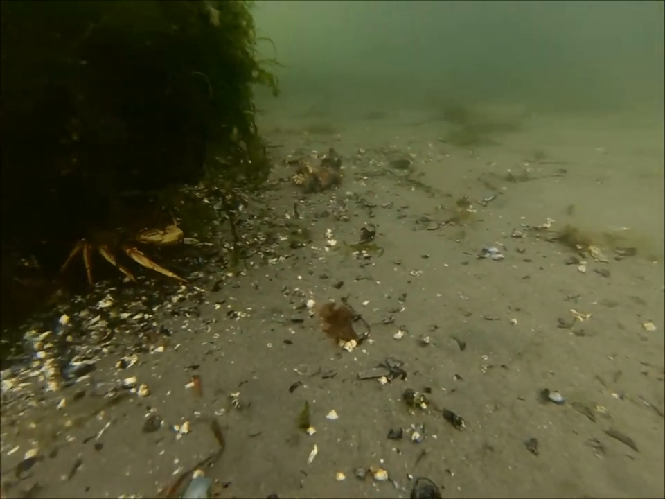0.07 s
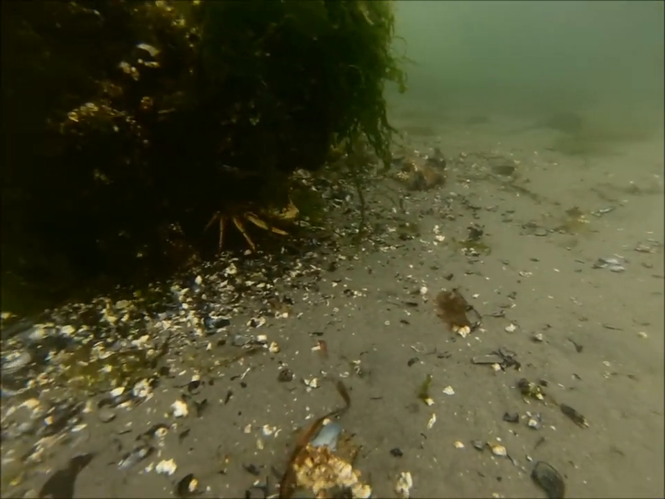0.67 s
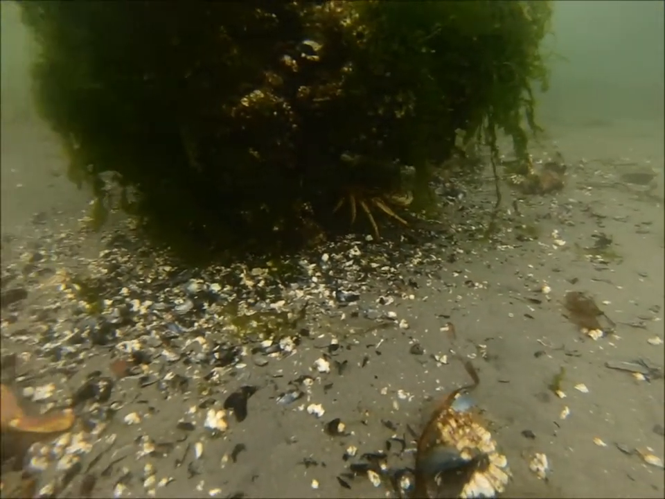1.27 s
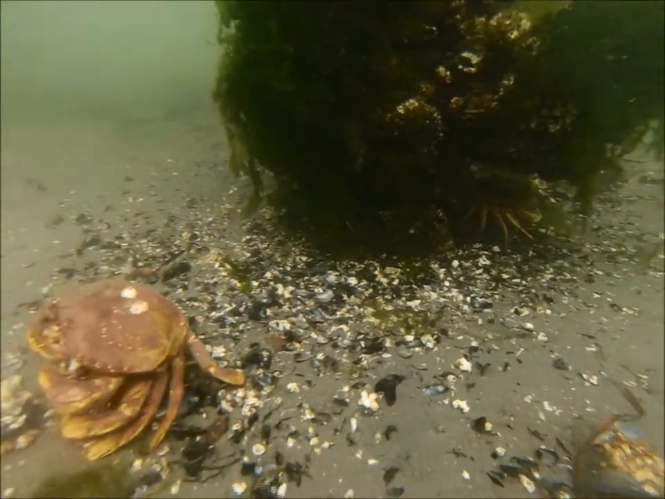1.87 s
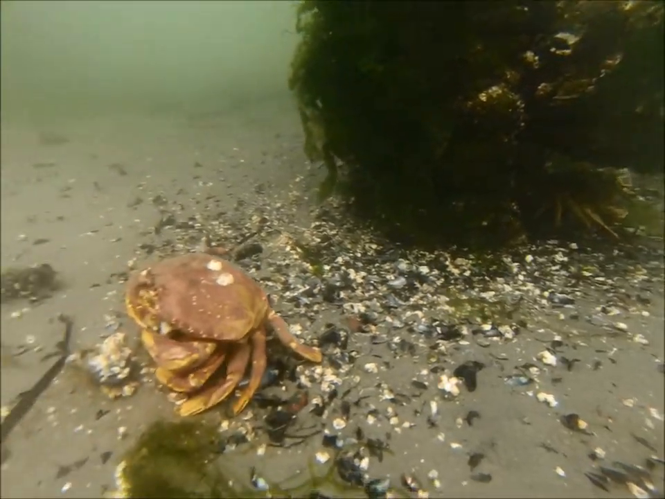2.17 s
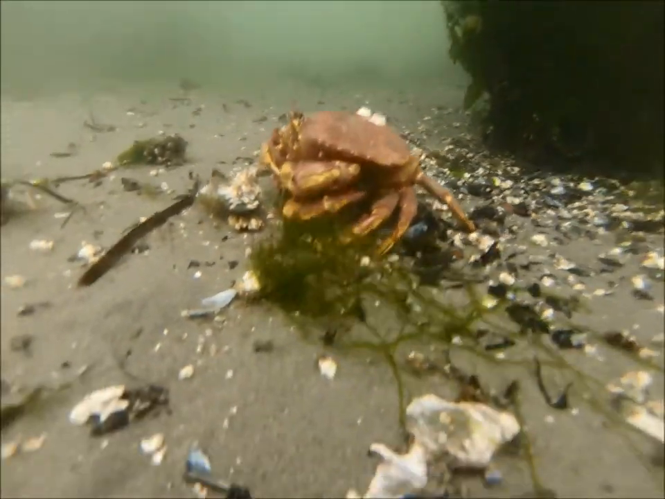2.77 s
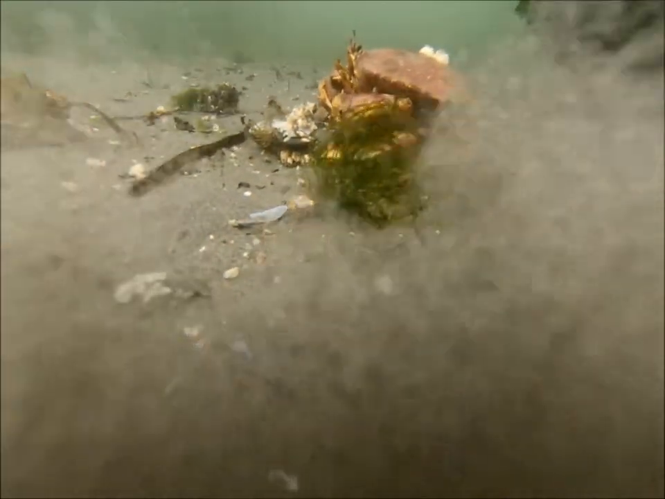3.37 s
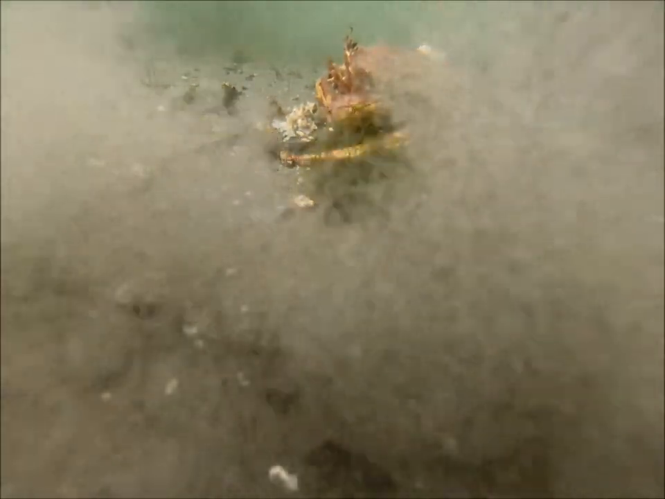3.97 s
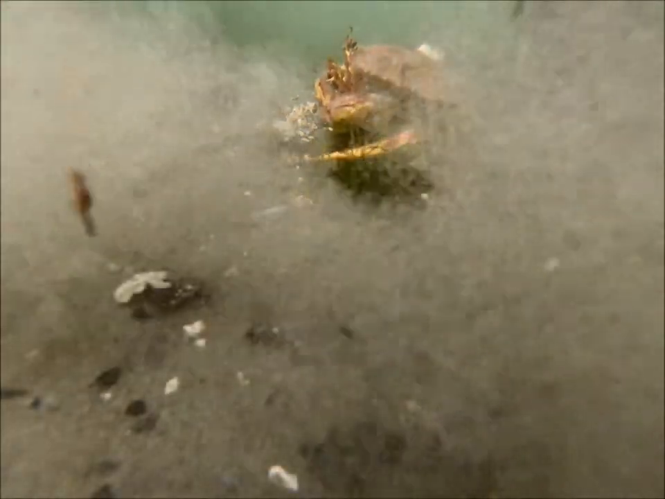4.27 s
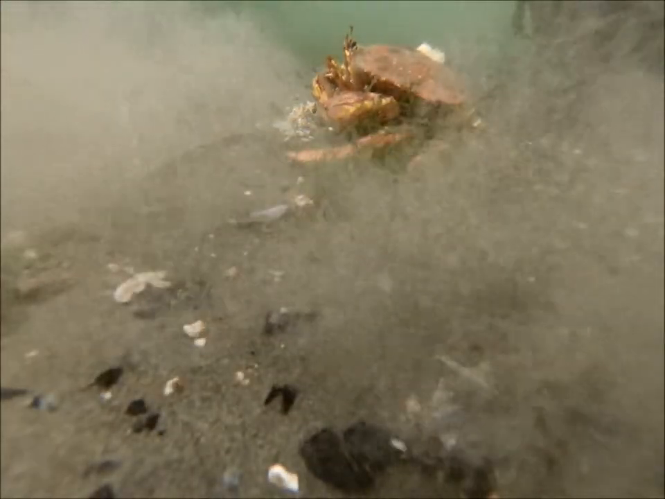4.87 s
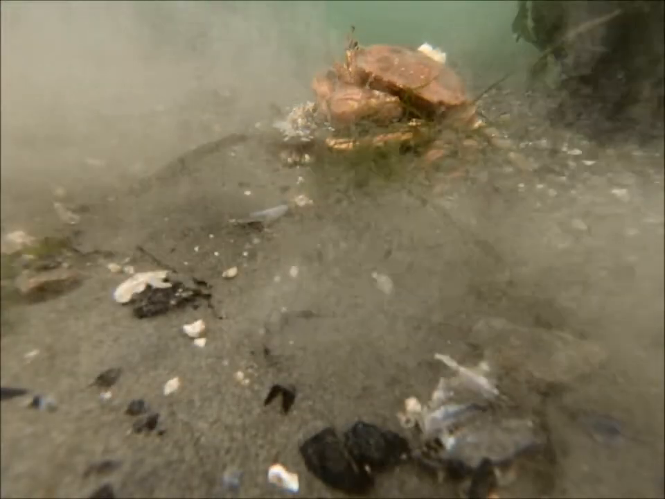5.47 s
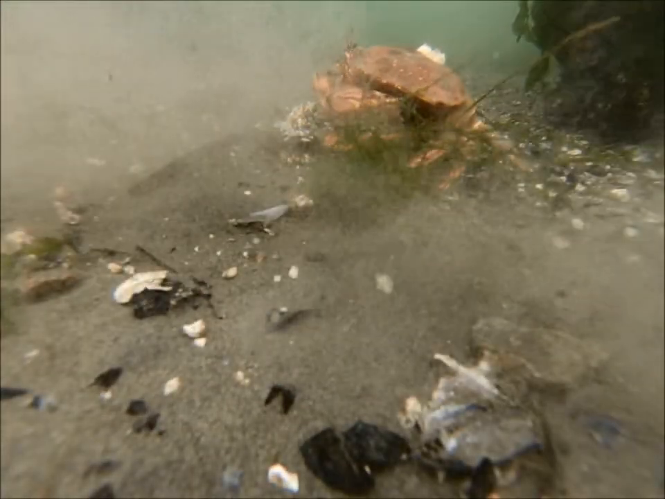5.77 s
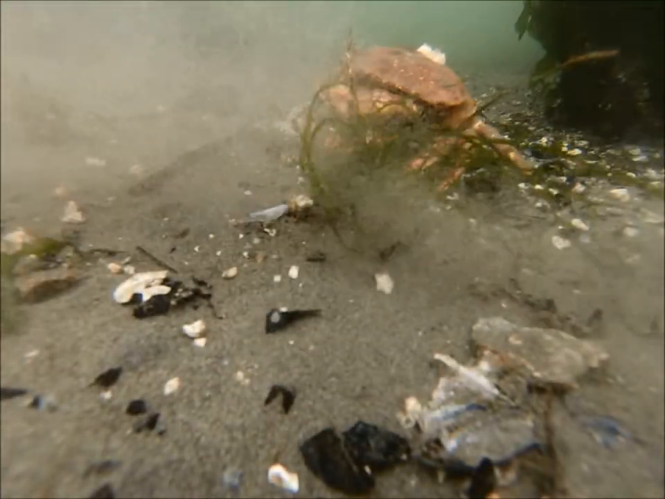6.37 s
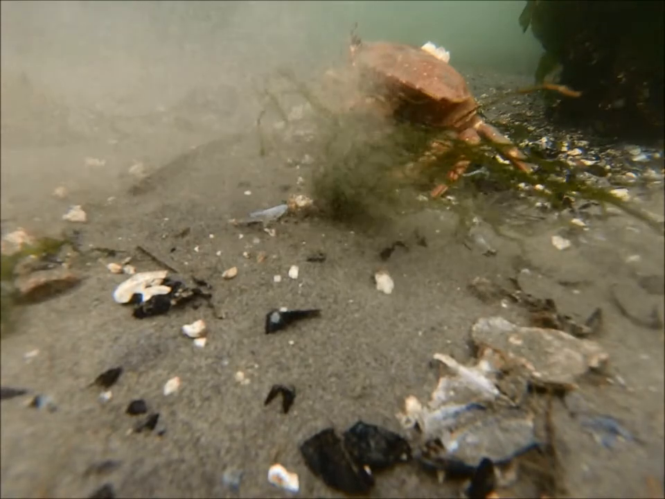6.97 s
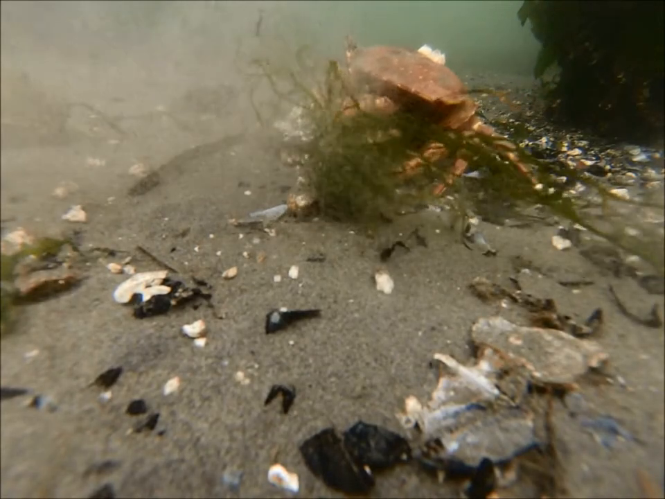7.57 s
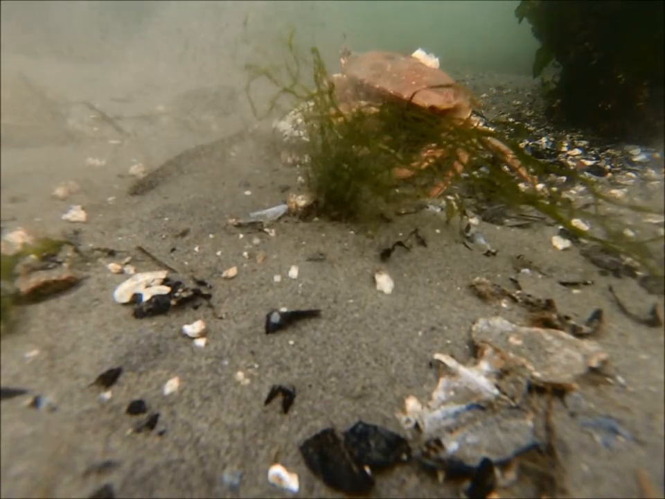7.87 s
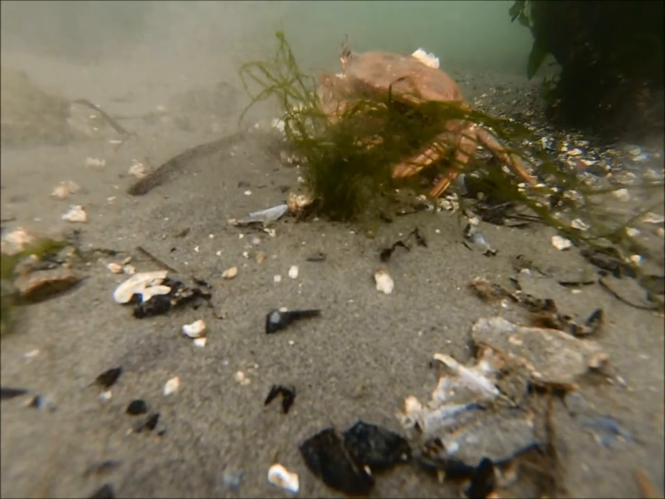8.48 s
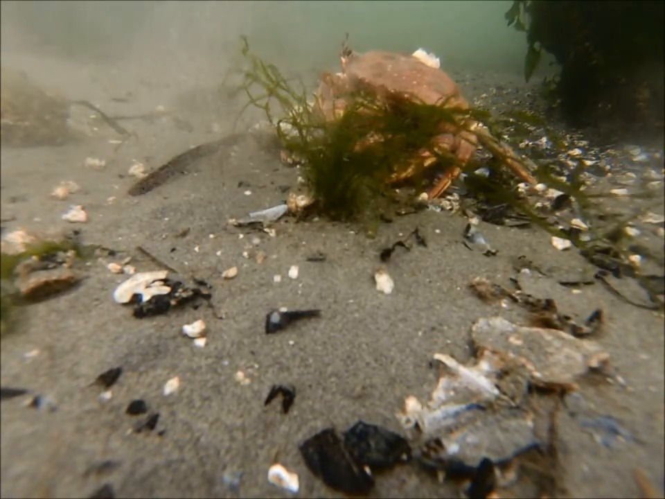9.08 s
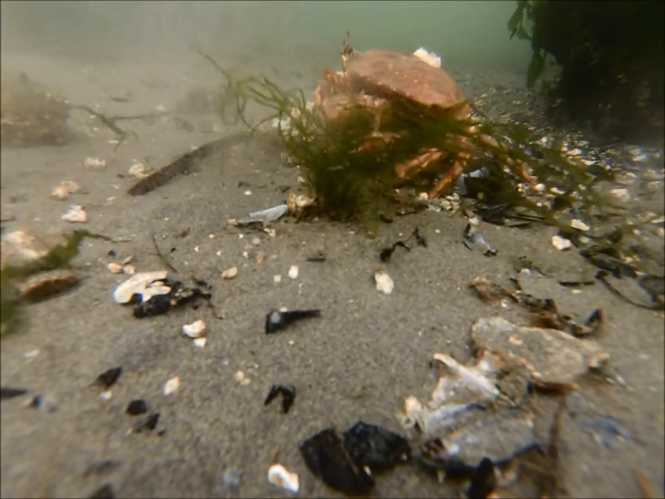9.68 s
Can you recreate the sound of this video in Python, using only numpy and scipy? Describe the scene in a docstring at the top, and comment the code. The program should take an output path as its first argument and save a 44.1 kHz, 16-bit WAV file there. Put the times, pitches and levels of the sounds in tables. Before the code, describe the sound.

A camera housing bumps down among sand and shells underwater, heard close through its own microphone. One sharp knock comes first, then several hollow, quickly damped knocks with a low thud and a short gritty scrape. Before and after, water rumbles softly against the case under a steady hiss. Once it has settled, loose grains tap faintly, the lens motor whirs almost inaudibly, and a few tiny clicks come from the water.

```python
"""A waterproof camera housing drifts over a sandy seabed and bumps down among shells.
Each contact rings its water-damped modes; it scrapes on sand and wobbles to rest, tapped by loose grains.
The hand rubs and shoves it, and the flow rumbles against it. Inside, the lens drive whirs in short runs
over microphone hiss. A few tiny snaps come from the water."""
import sys
import numpy as np
from scipy import signal
from scipy.fft import rfft, irfft
from scipy.io import wavfile

SR = 44100
rng = np.random.default_rng(int(sys.argv[2]) if len(sys.argv) > 2 else 0)


def to_wav(s):
    """Save 16-bit WAV."""
    ch = np.atleast_2d(s).T  # columns
    pcm = np.round(np.clip(ch, -1, 1) * 32767)  # PCM
    wavfile.write(sys.argv[1], SR, pcm.astype(np.int16))


N = 429093
TIME_S = np.arange(N) / SR
BINS_HZ = np.fft.rfftfreq(N, 1 / SR)

# Flow past the housing. Each row: time in seconds, sway level in dB, rumble level in dB.
FLOW_LEVELS = [(0, -56, -58.5), (1.0, -60, -62.5), (1.9, -56.5, -64), (2.8, -53.5, -60), (3.4, -59.5, -61),
               (4.0, -50.5, -62.5), (4.4, -57.5, -62.5), (5.1, -55, -57.5), (5.701, -62.5, -64.5),
               (6.6, -56, -59.5), (7.9, -61, -64), (8.9, -64.5, -63), (9.35, -54.5, -64.5),
               (9.73, -64.5, -64.5)]
# Slow pressure sway. Each row: frequency in Hz, relative density in dB.
SWAY_SPECTRUM = [(10, -23.5), (22, 7.5), (29, 8), (45, -2.5), (60, -8.5), (100, -53)]
# Flow rumble. Each row: frequency in Hz, relative density in dB.
RUMBLE_SPECTRUM = [(35, -16.5), (60, -9), (88, -1), (125, -9.5), (200, -11), (300, -22.5), (450, -45.5),
                   (570, -24.5), (800, -33), (1500, -46)]
# Hand friction. Each row: time in seconds, level in dB.
RUB_LEVELS = [(0, -66), (.25, -62), (.35, -86.5), (2.6, -83), (2.75, -70), (2.92, -62), (3.0, -100)]
# Housing modes. Each row: frequency in Hz, relative level in dB, base T60 in seconds.
HOUSING_MODES = [(188.2, -15.5, 0.059), (265, -14, 0.028), (377, -8, 0.075), (450, -12, .06),
                 (553, -3, 0.061), (732, -7.5, 0.055), (846.5, -8.5, 0.044), (1067, -2, 0.039),
                 (1320, -6.5, 0.061), (1514, -12.5, 0.0417), (1796, -4, 0.03), (2135, -11, 0.037),
                 (2550, -12.5, 0.029), (3136, -12.5, 0.031), (4460, -0.5, 0.011), (6930, -11.5, .012)]
# Microphone hiss. Each row: frequency in Hz, relative density in dB.
HISS_SPECTRUM = [(100, 15), (600, 3.5), (1000, -0.5), (2000, -2), (4000, -6), (7000, -8.5), (10000, -10.5),
                 (11000, -9), (12600, -12.5), (15000, -14.5)]
# Shoves on camera and grip. Each row: start in seconds, level in dB, swing rate in Hz, rise in seconds.
SHOVES = [(0.079, -36.5, 31.3, 0.058), (0.100, -44.5, 88, 0.044), (0.430, -39.5, 29.3, 0.099),
          (2.149, -41.5, 146.5, 0.031), (2.922, -31.5, 88, .0072), (2.996, -13.5, 30.6, .04),
          (3.007, -25, 87, .0027), (3.060, -34, 160, 0.0064), (3.616, -37.5, 146, .03),
          (5.879, -34, 85.4, .08), (6.440, -40.5, 71.4, 0.0035), (7.031, -38, 59.1, 0.026),
          (7.659, -43.5, 85, .03)]
# Lens drive resonances. Each row: centre in Hz, width in Hz, relative level in dB.
LENS_RESONANCES = [(2370, 105, -0.5), (2720, 180, -1.5), (3773, 420, -9), (10840, 1220, -6.5),
                   (13880, 890, -11.5), (14900, 450, -14.5)]
# Seabed contacts. Each row: start in seconds, peak in dB, brightness in Hz,
# two regions in Hz favoured by the struck spot, factor on ring time.
BED_CONTACTS = [(2.5662, -11, 2050, 1060, 1800, 0.67), (2.586, -38, 3000, 1810, 2600, .5),
                (2.5953, -21, 3900, 2210, 2600, 0.33), (2.602, -37, 5500, 2130, 3000, 1.3),
                (2.922, -17.5, 2270, 545, 554, 1.05), (2.93, -27.5, 2900, 1930, 1340, 0.3),
                (2.965, -37, 1500, 560, 1320, 1.0), (2.9743, -21.5, 903, 830, 800, 1.0),
                (3.0013, -10, 3157, 1317, 1957, 0.3), (3.003, -13, 1050, 757, 735, .75),
                (3.026, -27, 2500, 2130, 2154, .86), (3.038, -34, 3600, 1300, 1900, .45),
                (3.052, -37, 3900, 2130, 2500, .3), (3.0637, -26.5, 654, 550, 470, 0.6),
                (3.141, -16.5, 580, 374, 378, 1.04), (3.3224, -49, 1800, 1000, 600, .4),
                (4.456, -53, 700, 371, 553, 0.66), (4.8741, -55, 800, 470, 750, .6),
                (5.0897, -51, 1000, 750, 550, 0.36), (6.309, -54, 1100, 602, 750, 0.41)]
# Sand grinding under the housing. Each row: time in seconds, level in dB.
SCRAPE_LEVELS = [(2.93, -48), (2.99, -49.5), (3.02, -44), (3.08, -44.5), (3.15, -46), (3.2, -51),
                 (3.26, -64.5), (3.3, -87)]
# Grinding sand. Each row: frequency in Hz, relative density in dB.
SAND_SPECTRUM = [(150, 3), (380, -2.5), (560, 3.5), (830, 1), (1400, -15), (1750, -13), (2130, -5.5),
                 (2800, -19), (3500, -25.5), (8000, -49.5)]
# Snaps in the water. Each row: start in seconds, crack level in dB, ring level in dB, ring pitch in Hz.
WATER_SNAPS = [(3.067, -61, -50, 5860), (6.31, -48, -55, 8000), (6.9158, -56, -57, 4500),
               (8.4249, -63, -56, 7500), (9.1567, -65, -57, 7500), (9.5219, -46, -43.5, 7140)]


def amp(db):
    """dB to gain."""
    return 10 ** (np.asarray(db) / 20)


def unit(x):
    """Scale to rms 1."""
    return x / np.sqrt(np.mean(x ** 2) + 1e-20)


def add(mix, start_s, sound):
    """Mix in a sound at start_s."""
    part = mix[round(start_s * SR):][:len(sound)]
    part += sound[:len(part)]


def colour(x, points):
    """Filter by (Hz, dB) points; output at rms 1."""
    hz, db = np.transpose(points)
    gain = amp(np.interp(np.log(BINS_HZ + 1), np.log(hz), db))
    return unit(irfft(rfft(x) * gain, N))


def lowpass(x, hz, order):
    """Butterworth low-pass."""
    return signal.sosfilt(signal.butter(order, min(hz, .45 * SR), fs=SR, output="sos"), x)


def water(wake_rise_s=.04, wake_fade_s=.26, wake_sway_db=-51, wake_rumble_db=-58):
    """Uneven pressure on the housing: slow flow, plus a wake after each shove."""
    times_s, sway_db, rumble_db = np.transpose(FLOW_LEVELS)
    ages_s = (np.maximum(TIME_S - start_s, 0) for start_s, *_ in SHOVES)
    wakes = [(1 - np.exp(-age_s / wake_rise_s)) * np.exp(-age_s / wake_fade_s) for age_s in ages_s]
    wake = np.max(wakes, axis=0)
    sway_gain = np.hypot(amp(np.interp(TIME_S, times_s, sway_db)), amp(wake_sway_db) * wake)
    rumble_gain = np.hypot(amp(np.interp(TIME_S, times_s, rumble_db)), amp(wake_rumble_db) * wake)
    sway = sway_gain * colour(rng.standard_normal(N), SWAY_SPECTRUM)
    rumble = rumble_gain * colour(rng.standard_normal(N), RUMBLE_SPECTRUM)
    return sway + rumble


def hand_rub(cutoff_hz=480, damping=1.6):
    """A soft grip excites only the low housing modes."""
    body = sum(amp(db) / (1 + ((BINS_HZ - hz) * t60_s / damping) ** 2) for hz, db, t60_s in HOUSING_MODES)
    friction = irfft(rfft(rng.standard_normal(N)) * body, N)
    envelope = amp(np.interp(TIME_S, *np.transpose(RUB_LEVELS), right=-200))
    return envelope * unit(lowpass(friction, cutoff_hz, order=3))


def mic_hiss(mid_db=-61.5, side_db=-74):
    """Microphone noise: common to both channels, plus faint treble in opposite polarity."""
    side_spectrum = [(100, -9), (1500, -1.5), (6000, -1.5), (11000, -4), (15000, -11.5)]
    side = colour(rng.standard_normal(N), side_spectrum)
    mid = colour(rng.standard_normal(N), HISS_SPECTRUM)
    return amp(mid_db) * mid + amp(side_db) * np.array([side, -side])


def wobble(t60_cycles=30.4):
    """Each shove sets camera and grip swinging as a damped low sine."""
    out, t = np.zeros(N), np.arange(SR) / SR
    for start_s, db, hz, rise_s in SHOVES:
        attack = 1 - np.exp(-(2 * t / rise_s) ** 2)
        decay = amp(db - 60 * t * hz / t60_cycles)
        add(out, start_s, attack * decay * np.sin(2 * np.pi * hz * t))
    return out


def lens_drive(level_db=-71, range_db=3, run_s=.065, min_step_s=.14, max_step_s=.49, max_runs=60):
    """Short, unevenly spaced runs: friction noise in narrow resonances."""
    response = sum(amp(db) * np.exp(-2 * ((BINS_HZ - hz) / width_hz) ** 2)
                   for hz, width_hz, db in LENS_RESONANCES)
    spacing, strength = rng.random((max_runs, 2)).T
    starts_s = np.cumsum(min_step_s + (max_step_s - min_step_s) * spacing)
    gate = np.zeros(N)
    for start_s, db in zip(starts_s, range_db * (strength - .5)):
        add(gate, start_s, amp(db) * signal.windows.tukey(int(run_s * SR), .5))
    whir = unit(irfft(rfft(rng.standard_normal(N)) * response, N))
    return amp(level_db) * gate * whir


def knock(peak_db, bright_hz, spot1_hz, spot2_hz, ring_factor, push_db, spot_db=13, spot_spread=.13,
          rise_cycles=.94, crunch_db=-10, crunch_s=.0049, crack_db=-27, hard_hz=3500):
    """One contact: blunt push, short crunch, water-damped housing modes. Softer is duller."""
    t = np.arange(SR // 5) / SR
    hz, db, t60_s = np.transpose(HOUSING_MODES)[:, :, None]
    nearness = [np.exp(-(np.log(hz / spot_hz) / spot_spread) ** 2) for spot_hz in (spot1_hz, spot2_hz)]
    decay = amp(db + spot_db * np.maximum(*nearness) - 60 * t / (t60_s * ring_factor))
    attack = 1 - np.exp(-t * hz / rise_cycles)
    polarity = (-1) ** np.arange(len(hz))[:, None]  # neighbouring modes swing opposite ways
    modes = polarity * decay * attack * np.sin(2 * np.pi * hz * t)
    crunch = rng.standard_normal(len(t)) * np.exp(-t / crunch_s)
    push_phase = np.pi * bright_hz * t
    push = amp(push_db) * push_phase * (2 - push_phase) * np.exp(-push_phase)
    body = lowpass(modes.sum(0) + amp(crunch_db) * crunch + push, bright_hz, order=4)
    # Hard contacts, on shell, add a thin crack.
    hardness = min(bright_hz / hard_hz, 1) ** 4
    crack = amp(crack_db) * hardness * crunch * np.exp(-2 * t / crunch_s)
    return amp(peak_db) * (body / abs(body).max() + lowpass(crack, hz=9000, order=1))


def grit(count=30, min_db=-61, range_db=7, low_hz=600, high_hz=1600, until_s=6.5):
    """Loose grains tap the housing until the silt settles."""
    out = np.zeros(N)
    for when, size, hardness in rng.random((count, 3)):
        hz = low_hz * (high_hz / low_hz) ** hardness
        tap = knock(min_db + range_db * size, hz, hz, hz / 2, ring_factor=.4, push_db=0)
        add(out, when * until_s, tap)
    return out


def bed_knocks(ref_push_db=2.5, ref_hz=2000, push_db_per_octave=6.5):
    """The housing hits the seabed; softer contacts push more than they ring."""
    out = np.zeros(N)
    for start_s, peak_db, bright_hz, *spot in BED_CONTACTS:
        push_db = ref_push_db + push_db_per_octave * np.log2(ref_hz / bright_hz)
        add(out, start_s, knock(peak_db, bright_hz, *spot, push_db))
    return out


def sand_scrape(grains_per_s=3000, size_db=3):
    """Grains slip under the settling housing as sparse random impulses."""
    impulses = rng.standard_normal(N) * amp(size_db * np.minimum(rng.exponential(1, N), 4))
    slips = rng.random(N) < grains_per_s / SR
    envelope = amp(np.interp(TIME_S, *np.transpose(SCRAPE_LEVELS), left=-200, right=-200))
    return envelope * colour(impulses * slips, SAND_SPECTRUM)


def snaps(crack_s=.00074, ring_s=.00094):
    """Millisecond cracks in the water, each with a brief high ring."""
    out, t = np.zeros(N), np.arange(SR // 100) / SR
    for start_s, crack_db, ring_db, hz in WATER_SNAPS:
        crack = np.diff(rng.standard_normal(len(t) + 1)) * np.exp(-t / crack_s)
        ring = np.sin(2 * np.pi * hz * t) * np.exp(-t / ring_s)
        add(out, start_s, amp(crack_db) * crack + amp(ring_db) * ring)
    return out


def scene():
    """The sealed housing feeds both channels alike; only the hiss is stereo."""
    handling = bed_knocks() + wobble() + sand_scrape() + hand_rub()
    return handling + grit() + water() + lens_drive() + snaps() + mic_hiss()


def record(dry):
    """Recorder band limit."""
    taps = signal.firwin(511, cutoff=15350, window=("kaiser", 9), fs=SR)
    return signal.oaconvolve(dry, taps[None], "same")


dry = scene()
out = record(dry)
to_wav(out)
```